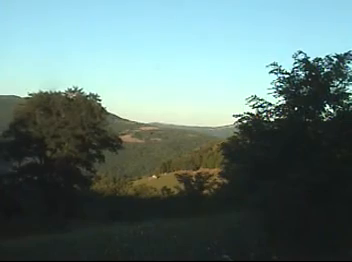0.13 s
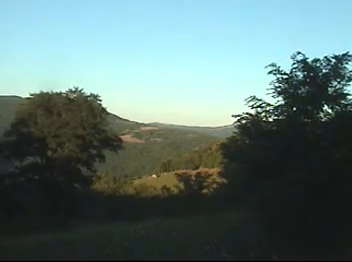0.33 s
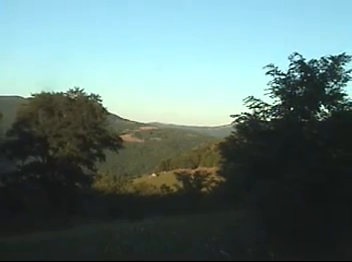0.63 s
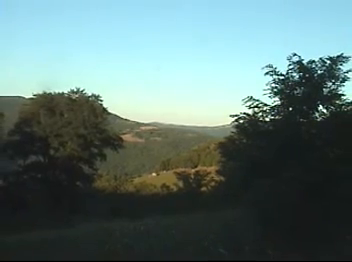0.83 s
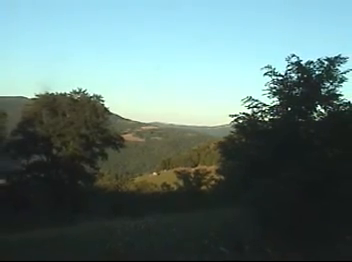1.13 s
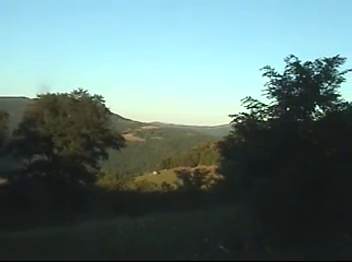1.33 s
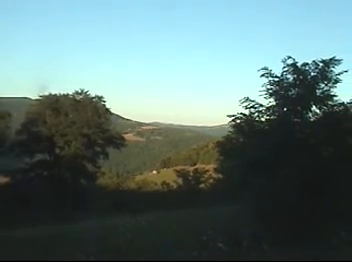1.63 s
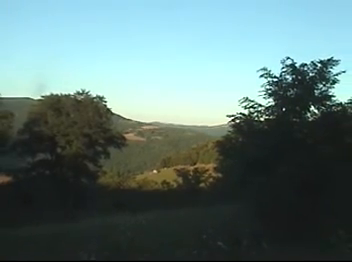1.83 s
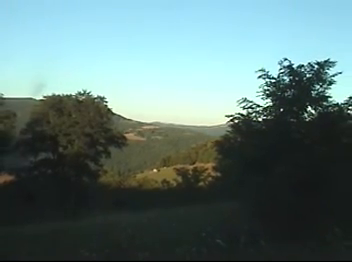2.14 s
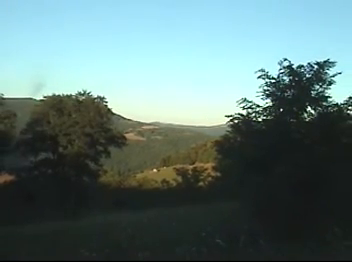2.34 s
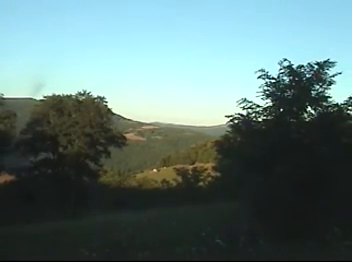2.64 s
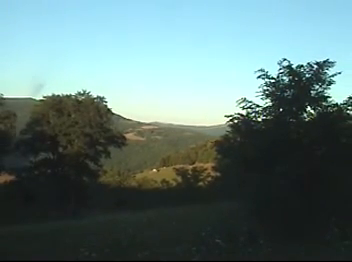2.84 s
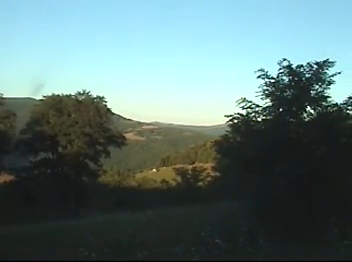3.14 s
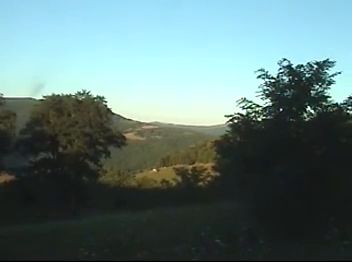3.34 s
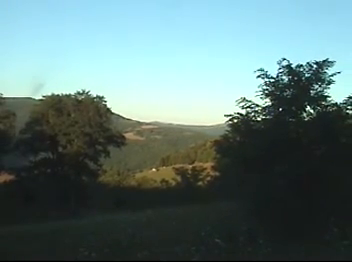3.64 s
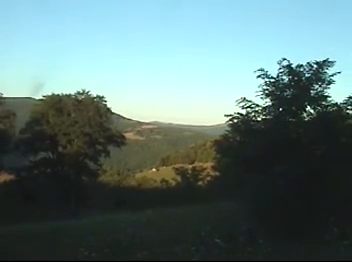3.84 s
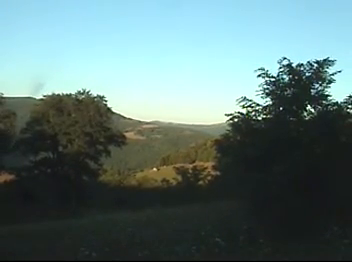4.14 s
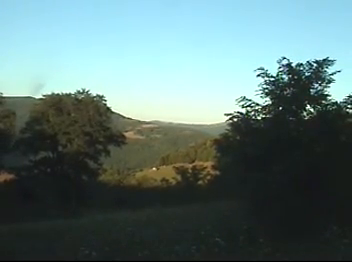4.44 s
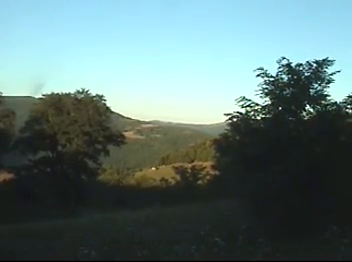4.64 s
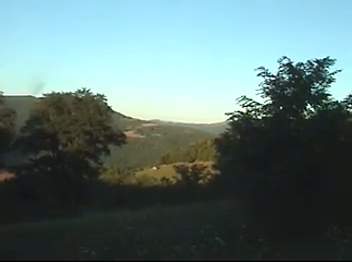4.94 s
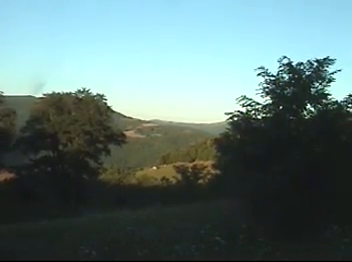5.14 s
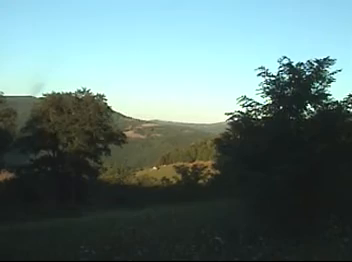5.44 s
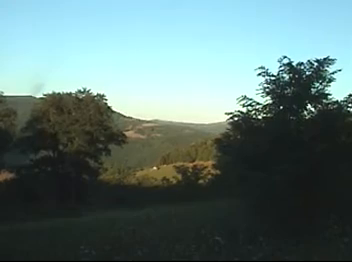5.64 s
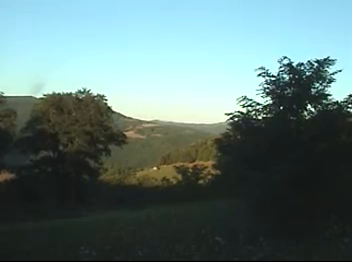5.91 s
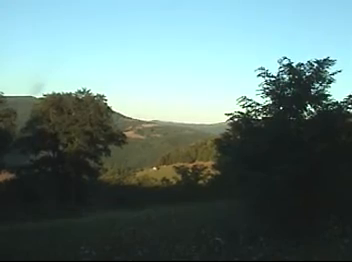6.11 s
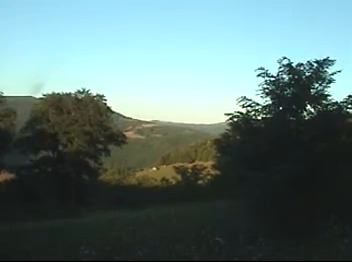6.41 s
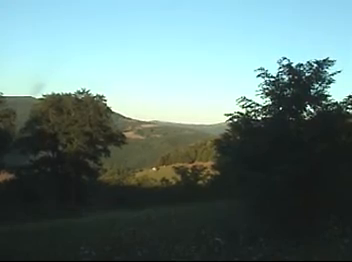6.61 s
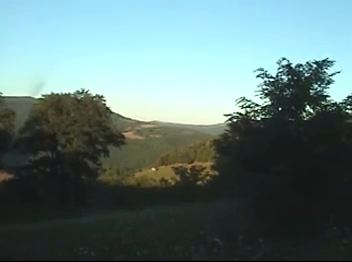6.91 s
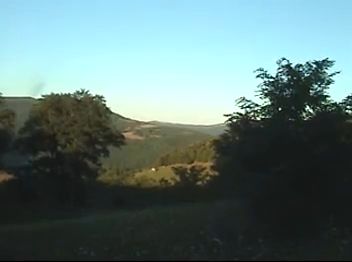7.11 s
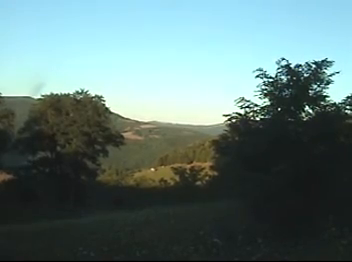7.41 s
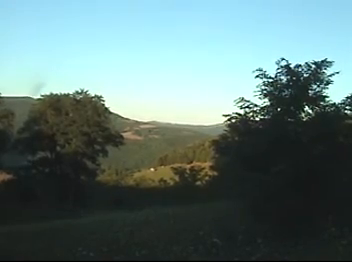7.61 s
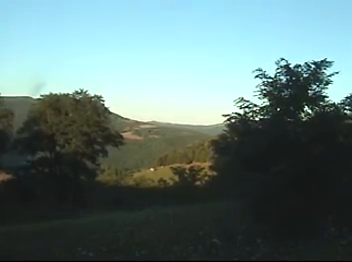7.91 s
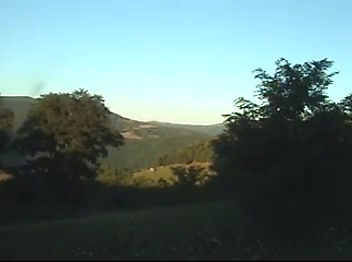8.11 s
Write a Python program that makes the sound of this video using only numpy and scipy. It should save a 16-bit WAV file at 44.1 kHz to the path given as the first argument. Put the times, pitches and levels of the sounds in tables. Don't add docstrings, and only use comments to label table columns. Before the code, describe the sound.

Dusk meadow insects: a near cricket chirps about twice a second, a rival answers, tiny trills and ticking rasps run above soft hiss.

```python
import sys
import numpy as np
from scipy import signal
from scipy.fft import rfft, irfft, next_fast_len
from scipy.io import wavfile
from scipy.ndimage import uniform_filter1d

SR = 44100
rng = np.random.default_rng(int(sys.argv[2]) if len(sys.argv) > 2 else 0)


def generate_wav(signal):
    frames = np.transpose(np.atleast_2d(signal))
    scaled = np.clip(frames, -1, 1) * 32767
    pcm = np.round(scaled).astype(np.int16)
    wavfile.write(sys.argv[1], SR, pcm)


def field_ratio(decibels):
    return 10 ** (np.asarray(decibels, dtype=float) / 20)


N = 364266


def level(x, db):
    return x * field_ratio(db) / np.sqrt(np.mean(x ** 2))


def band(x, hz, width_hz, order=1):
    edges = np.clip([hz - width_hz / 2, hz + width_hz / 2], 1, SR / 2.1)
    return signal.sosfilt(signal.butter(order, edges, "band", fs=SR, output="sos"), x)


def colour(points):
    hz, db = np.transpose(points)
    size = next_fast_len(N, real=True)
    bins = np.arange(1, size // 2 + 2) * SR / size
    shape = field_ratio(np.interp(np.log(bins), np.log(hz), db))
    return irfft(rfft(rng.standard_normal(size)) * shape, size)[:N]


def walk(rate):
    k = int(SR / rate)
    held = np.repeat(rng.standard_normal(N // k + 1), k)
    return 1.3 * uniform_filter1d(uniform_filter1d(held, k), k)[:N]


def add(out, x, s, pan_db):
    i = max(int(s * SR), 0)
    sides = field_ratio(np.array([[pan_db], [-pan_db]]) / 2)
    out[:, i:i + x.shape[-1]] += (x * sides)[:, :max(N - i, 0)]


def paced(rows, period_s):
    rows = np.reshape(rows, (len(rows), -1))
    number = np.cumsum(np.round(np.diff(rows[:, 0], prepend=rows[0, 0]) / period_s))
    beats = np.arange(number[-1] + 1)
    return np.transpose([np.interp(beats, number, column) for column in rows.T])


def meadow(x, t60_s, db):
    t = np.arange(SR // 2) / SR
    tail = rng.standard_normal((2, len(t))) * np.exp(-np.log(1000) * t / t60_s) * (t > .011)
    earlier = np.concatenate([x[:, -len(t):], x], axis=1)
    return signal.oaconvolve(earlier, level(tail, db) / np.sqrt(len(t)), axes=1)[:, len(t):len(t) + N]


def strokes(rows, fall_hz, rise_hz, top_at, round_, rough, octave_db, lead):
    stroke_shape = [(0, 0.71), (.05, 0.56), (.2, 0.8), (.38, 1), (.6, 0.78), (.8, 0.62), (.92, 0.26),
                    (1, 0.08)]
    out = np.zeros((2, N))
    knots = np.linspace(0, 1, 16)
    chance = zip(lead, rng.random(len(rows)), rng.standard_normal((len(rows), len(knots))))
    for (s, ms, hz, db, pan_db), (left, start, grip) in zip(rows, chance):
        t = np.arange(int(ms * SR / 1000)) / SR
        u = t / (len(t) / SR)
        sag = fall_hz * (np.maximum(t - top_at * ms / 1000, 0) / .023) ** 1.5 + 250 * u ** 6
        climb = rise_hz * (np.maximum(top_at - u, 0) / top_at) ** 2
        phase = 2 * np.pi * (start + np.cumsum(hz - sag - climb) / SR) + np.array([[left], [0]])
        uneven = 1 + rough * np.interp(u, knots, grip)
        swell = np.interp(u, *np.transpose(stroke_shape)) ** round_ * uneven * (1 - np.exp(-t / .001))
        overtone_db = octave_db - 1.31 * pan_db + np.array([[2.5], [-2.5]])
        flutter_db = 3.2 * np.interp(1 - u, knots, grip)
        late_growth = u ** (0.56 * max(30 - ms, 0) / 10)
        octave = field_ratio(overtone_db + flutter_db) * late_growth
        add(out, field_ratio(db) * swell * (np.sin(phase) + octave * np.sin(2 * phase + 1)), s, pan_db)
    return out


def microphone_hiss():
    # pitch_hz, level_db
    hiss_curve = [(25, -9.5), (50, -9), (110, -4.5), (250, -3), (800, -2.5), (1300, -7), (2200, -8),
                  (2800, -8.4), (3150, -12), (3600, -8.5), (7600, -11.4), (9300, -10), (13500, -16)]
    # pitch_hz, difference_db
    side_curve = [(30, 0.5), (150, 2.5), (1500, 3), (4000, -2.5), (14000, -1)]
    side_hz, side_db = np.transpose(side_curve)
    side = [(hz, db + np.interp(np.log(hz), np.log(side_hz), side_db)) for hz, db in hiss_curve]
    mid = colour(hiss_curve)
    return (mid + colour(side) * np.array([[1], [-1]])) * field_ratio(-61.5) / mid.std() * field_ratio([[-.4], [.4]])


def tape_motor():
    # pitch_hz, left_db (rms), right_db (rms), left_lead (radians)
    motor_lines = [(59.9, -84, -83, 0), (922.5, -73, -79, 1.9), (1093, -74, -76, -2.2), (1378, -76, -76, 0),
                   (1792, -95, -82, 0), (2328, -89, -81, .8), (2491, -91, -82, -1), (2620, -88, -82, -1),
                   (2688, -89, -84, -.3), (2756, -85, -84, 0), (2911, -89, -82, -1.8),
                   (3360, -92, -83, 1.5), (3492, -92, -82, -1), (6891, -88, -87, 0), (12403, -89, -89, 0)]
    t = np.arange(N) / SR
    return sum(field_ratio([[left], [right]]) * field_ratio(3 + walk(6))
               * np.sin(2 * np.pi * hz * t + .4 * walk(3) + [[lead], [0]])
               for hz, left, right, lead in motor_lines)


def breeze():
    # peak_s, level_db, fall (dB per s)
    gusts = [
        (2.5, -65.5, 15),
        (5.55, -65.5, 23),
    ]
    rise_db_per_s, calm_db = 75, -80
    t = np.arange(N) / SR
    strength = field_ratio(calm_db) + sum(
        field_ratio(db - np.where(t < s, rise_db_per_s * (s - t), fall_db * (t - s))) for s, db, fall_db in gusts)
    hum = level(band(rng.standard_normal((2, N)), 348, 156, order=2), 0)
    return hum * strength * field_ratio([[-2.5], [3.5]])


def far_chorus(count, hz, spread_hz, scatter_db, wide, db):
    when, a, b, c, d = rng.random(count), *rng.standard_normal((4, count))
    start_s = (np.arange(count) + when) / count * N / SR
    rows = np.transpose([start_s, 27 + 3 * a, hz + spread_hz * b, scatter_db * c, 5.32 * d])
    lead = 0.15 + wide * rng.standard_normal(count)
    return level(strokes(rows, 714, 80, 0.2626, 0.71, 0.26, -27, lead), db)


def arching_triller():
    arch_starts = [.023, .304, .36, .502, .558, .675, 1.177, 1.842, 1.909, 2.122]
    rows = [(s, 23, 6670, -57 + 1.1 * rng.standard_normal(), 8.0) for (s,) in paced(arch_starts, .071)]
    return strokes(rows, 1500, 560, 0.455, 0.75, .3, -31, np.full(len(rows), .35))


def bush_cricket():
    # end_s, level_db
    rasp_ends = [(.056, -59.5), (.384, -59.6), (.696, -61.5), (1.013, -58.3), (1.99, -59.3), (2.158, -57.6),
                 (2.498, -59.9), (2.861, -61.2), (3.359, -61), (3.508, -60.3), (4.337, -59.6), (4.478, -61),
                 (4.652, -60.8), (5.134, -62.3), (5.306, -62), (5.461, -61.3), (5.791, -57.5),
                 (5.945, -57.3), (6.601, -58.2), (7.252, -59.6), (7.586, -64), (7.743, -63.5),
                 (8.073, -60.3), (8.248, -60.5)]
    rasps = paced(rasp_ends, .164)
    teeth = 34
    clicks, out = np.zeros((2, N)), np.zeros((2, N))
    t = np.arange(110) / SR
    squeak = np.hanning(len(t)) ** 0.26 * np.sin(2 * np.pi * np.cumsum(13200 - 1400000.0 * t) / SR)
    effort = np.sin(np.pi * np.linspace(.2, .97, teeth)) ** 0.45
    for (s, db), (gap, size, low) in zip(rasps, rng.standard_normal((len(rasps), 3, teeth))):
        before = 0.0033 + np.cumsum(.0016 * np.linspace(.8, 1.4, teeth) * (1 + .12 * gap))
        at = ((s - before) * SR).astype(int)
        blow = field_ratio(db + 1.4 * size + 2.6 * np.array([low, -low])) * effort
        clicks[:, at[at > 0]] += blow[:, at > 0]
        add(out, squeak * field_ratio(db + 3.8 + 0.87 * size[0]), s - .0025, 2.5)
    wing = band(clicks[0], 10300, 2200, order=2) - field_ratio(-2.5) * band(clicks[1], 12500, 2700, order=2)
    rasp = field_ratio(18.9) * wing * field_ratio([[2.1], [-2.1]])
    return out + rasp + meadow(rasp, .06, -3.5)


def field_song():
    # length_ms, top_pitch_hz, peak_db (0: set by the chirp), left_minus_right_db
    near_strokes = [
        (9.5, 4110, 0, -2),
        (23.6, 4385, -34.4, -2.5),
        (28.6, 4438, -33.4, -3.5),
        (30, 4462, -33.3, -3.8),
    ]
    # first_full_stroke_s, second_gap_ms, third_gap_ms, pickup_db
    near_chirps = [(.235, 43, 56, -42.5), (.738, 44, 55, -46.5), (1.287, 45, 56, -42),
                   (1.766, 44, 60, -45.5), (2.269, 48, 57, -43), (2.789, 44, 54, -43),
                   (3.305, 46, 55, -42.5), (3.841, 44, 60, -42.5), (4.354, 45, 57, -44.5),
                   (4.903, 46, 54, -50.5), (5.673, 44, 57, -43), (6.223, 48, 53, -46.5),
                   (6.759, 44, 56, -43.5), (7.364, 46, 55, -44), (7.898, 51, 52, -43)]
    # length_ms, top_pitch_hz, build_up_steps (below the last)
    rival_strokes = [
        (19, 4635, 4.2),
        (26, 4745, 1),
        (26, 4800, 0),
    ]
    # start_s, second_gap_ms, third_gap_ms, last_stroke_db, build_up_step_db
    rival_chirps = [(.8, 45, 49, -36.5, 4.6), (2.756, 49, 53, -37, 1.1), (3.442, 45, 55, -36, 1.2),
                    (4.502, 44, 58, -35, 3.4), (5.774, 44, 56, -35.5, 2.1), (6.352, 47, 52, -35, 2.1),
                    (7.236, 43, 55, -34.5, 1.1), (7.727, 47, 56, -34, 1.5)]
    # start_s, gap_ms, top_pitch_hz, peak_db, left_minus_right_db
    pairs = [(.815, 48, 4575, -49.5, 3), (1.592, 48, 4610, -51, 10), (1.936, 46, 4350, -53, 1.5),
             (2.147, 49, 4625, -50, 7.5), (2.926, 52, 4640, -51, 8), (4.1, 54, 4380, -53, 0.1),
             (5.237, 57, 4675, -51, -5), (5.512, 48, 4300, -53, 0.1), (6.492, 53, 4625, -50, -3),
             (6.655, 47, 4350, -55, -3), (7.445, 48, 4380, -53, -3)]
    # start_s, length_ms, top_pitch_hz, peak_db, left_minus_right_db
    lone_strokes = [(.672, 21, 4300, -59, -4), (.762, 26, 4425, -49.5, 2), (1.821, 24, 4675, -41, 0),
                    (4.052, 18, 4300, -57, 0.1), (5.612, 20, 4350, -54, 0.1), (7.202, 11, 4325, -49, -2),
                    (7.521, 27, 4725, -51.5, -2), (8.063, 10, 4650, -48.5, -4), (8.228, 24, 4350, -53, 0.1)]
    rows = list(lone_strokes)
    pickup_s, usual_gaps_ms = .031, (45, 56)
    late_shortens = .45
    for s, *gaps, pickup_db in near_chirps:
        starts = s + np.cumsum([-pickup_s, pickup_s, gaps[0] / 1000, gaps[1] / 1000])
        late = [0, 0, *np.subtract(gaps, usual_gaps_ms)]
        rows += [(at, ms - late_shortens * by, hz, db or pickup_db, pan_db)
                 for at, by, (ms, hz, db, pan_db) in zip(starts, late, near_strokes)]
    for s, first, second, db, step_db in rival_chirps:
        starts = s + np.cumsum([0, first, second]) / 1000
        rows += [(at, ms, hz, db - steps * step_db, 0.1) for at, (ms, hz, steps) in zip(starts, rival_strokes)]
    for s, gap, hz, db, pan_db in pairs:
        rows += [(at, 19.5, hz, db, pan_db) for at in (s, s + gap / 1000)]
    return rows


def field_crickets():
    scatter = (0, .015, .002, .006, .12)
    # from_s, to_s, level_db
    catches = [
        (2.886, 2.8957, -16),
        (4.454, 4.4664, -10),
        (5.7785, 5.781, -6),
    ]
    rows = np.array(field_song(), float)
    rows = rows * (1 + rng.standard_normal(rows.shape) * scatter)
    song = strokes(rows, 648, 55, 0.281, .95, 0.055, -25, np.full(len(rows), .33))
    grip = np.ones(N)
    for start, end, db in catches:
        grip[int(start * SR):int(end * SR)] = field_ratio(db)
    return song * uniform_filter1d(grip, size=16)


def falling_trillers():
    # start_s, top_pitch_hz, peak_db
    bouts = [
        [(1.395, 5960, -60), (1.615, 6030, -59.5), (2.053, 6150, -56), (2.896, 6295, -56), (3.288, 6300, -56),
         (3.537, 6260, -55.5), (4.385, 6375, -55.5), (5.503, 6370, -56), (5.835, 6380, -56.5)],
        [(5.366, 6200, -59), (5.849, 6330, -59), (6.199, 6225, -61), (6.291, 6200, -64), (6.476, 6250, -60),
         (6.66, 6325, -57), (6.923, 6250, -60)],
        [(6.399, 6200, -60), (6.747, 6150, -57), (7.171, 6275, -57.5), (7.624, 6450, -56), (7.862, 6475, -54),
         (7.934, 6480, -54.5), (8.169, 6475, -56)],
    ]
    periods_s = (.078, .085, .074)
    beats = np.concatenate([paced(bout, period) for bout, period in zip(bouts, periods_s)])
    rows = [(s, 29, hz + 25 * a, db + 1.1 * b, 2.2)
            for (s, hz, db), (a, b) in zip(beats, rng.standard_normal((len(beats), 2)))]
    return strokes(rows, 720, 100, .25, .75, .22, -40, np.full(len(rows), .22))


def finger_taps():
    # pitch_hz, level_db, t60_s (time to die away)
    case_rings = [(97, -16, 0.078), (337, -5, 0.08), (480, -9, 0.03), (720, 0.3, 0.016), (2100, -3, 0.016)]
    # start_s, ring_db, push_ms, crack_db
    touches = [
        (4.454, -62, 0.11, -44),
        (4.458, -58, 0.33, -46),
        (4.465, -61, .1, -47),
        (4.778, -41, 0.7, -51),
    ]
    out = np.zeros((2, N))
    t = np.arange(SR // 8) / SR
    ring = sum(field_ratio(db) * np.sin(2 * np.pi * hz * t) * np.exp(-np.log(1000) * t / t60)
               for hz, db, t60 in case_rings)
    ring = band(ring, 5000, 9900)
    for (s, db, ms, crack_db), grit in zip(touches, rng.standard_normal((len(touches), len(t)))):
        push = np.hanning(int(ms * SR / 1000) + 3)
        knock = np.convolve(ring, push / push.sum())[:len(t)]
        crack = band(grit, 2400, 3900) * np.exp(-t / 0.0045)
        add(out, field_ratio(db) * knock + field_ratio(crack_db) * crack, s, -1.5)
    return out


def scene():
    camera = microphone_hiss() + tape_motor() + breeze() + finger_taps()
    far = far_chorus(count=1050, hz=4850, spread_hz=255, scatter_db=1.5, wide=0.7, db=-63.6)
    far = far + far_chorus(count=260, hz=6390, spread_hz=195, scatter_db=0.5, wide=0.54, db=-72)
    wash = meadow(far, .9, 5)
    near = arching_triller() + bush_cricket() + field_crickets() + falling_trillers()
    echo = meadow(near, .2, -23)
    return near + echo + far + wash + camera


def roll_off(x):
    return signal.sosfilt(signal.butter(12, 14480, fs=SR, output="sos"), x)


def record(dry):
    body, wide = (signal.sosfiltfilt(signal.ellip(8, .1, 60, hz, fs=SR, output="sos"), dry)
                  for hz in (13640, 14450))
    top = wide - body
    power = uniform_filter1d(np.sum(top ** 2, axis=0), size=2048)
    gate = uniform_filter1d(1. * (power > np.percentile(power, 82)), size=512)
    mix = body + field_ratio(-4) * gate * top - .0004
    return roll_off(mix)


dry = scene()
out = record(dry)
generate_wav(out)
```